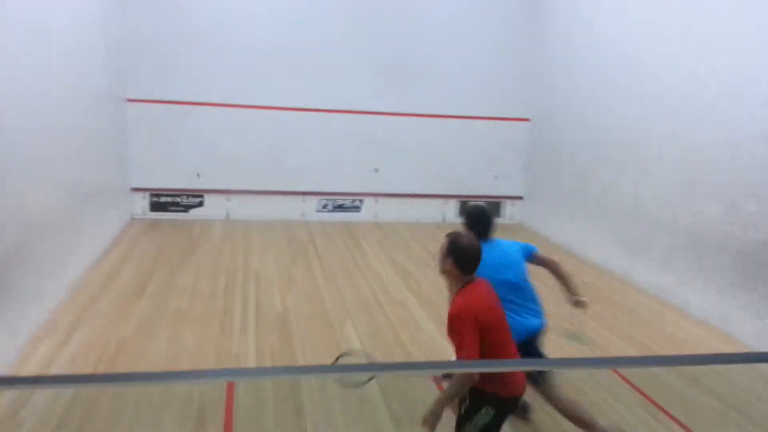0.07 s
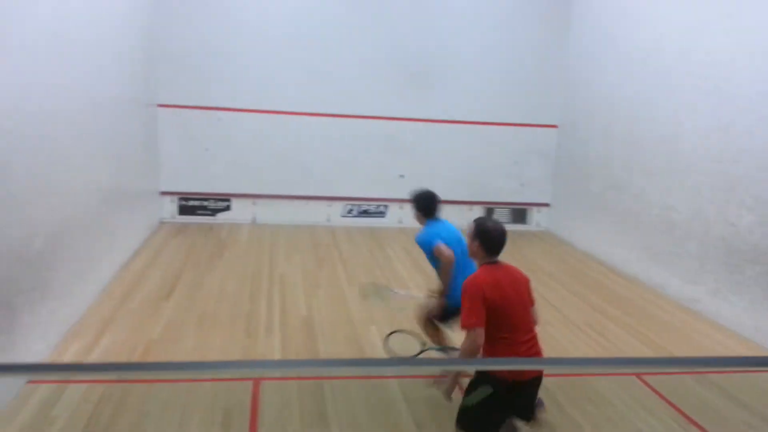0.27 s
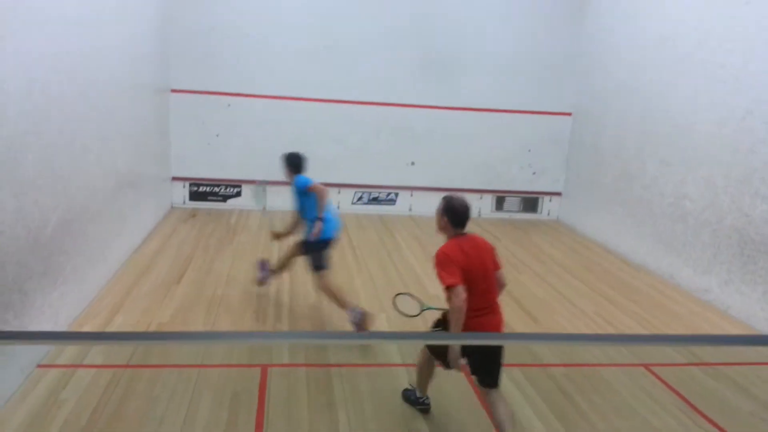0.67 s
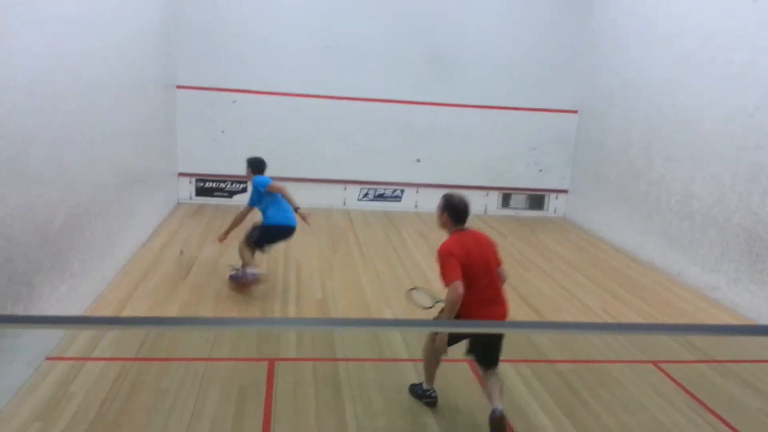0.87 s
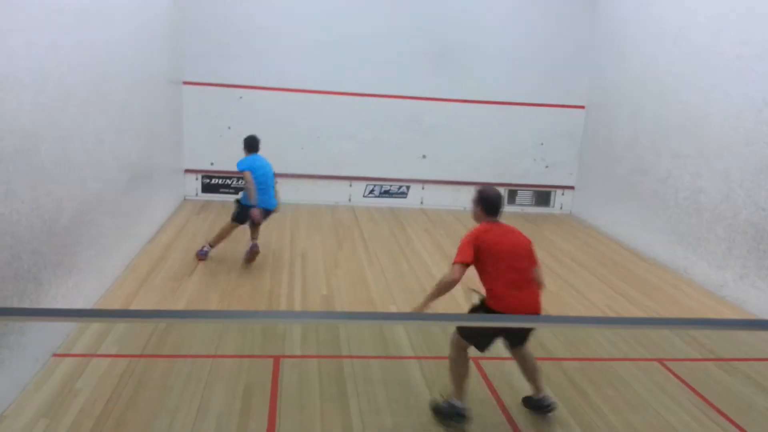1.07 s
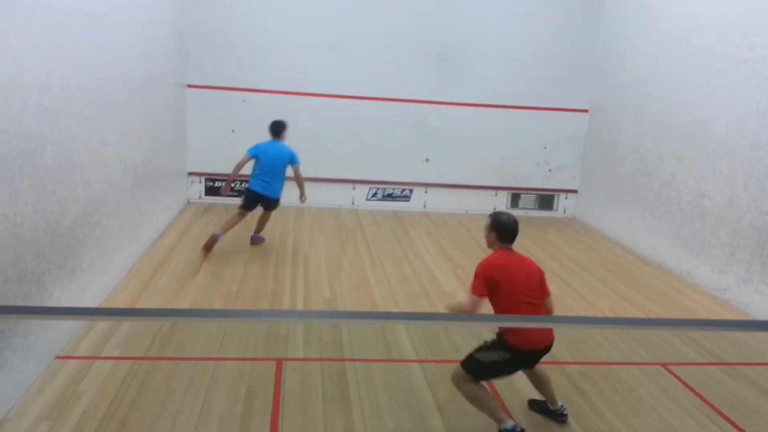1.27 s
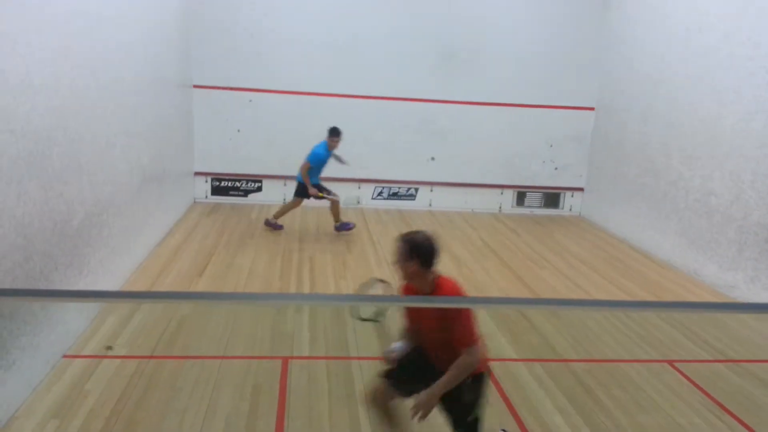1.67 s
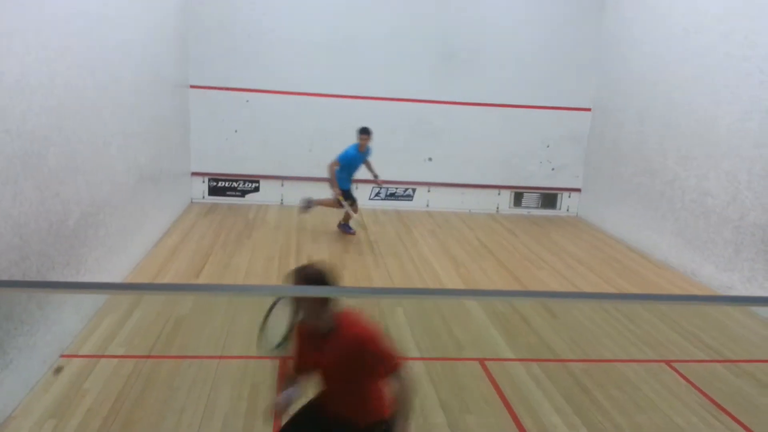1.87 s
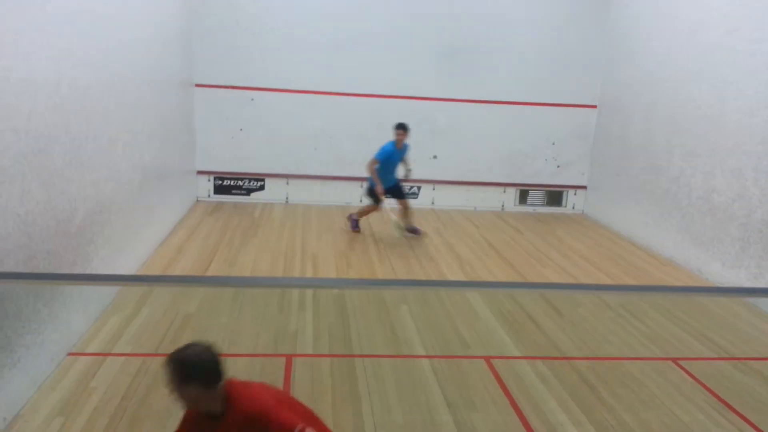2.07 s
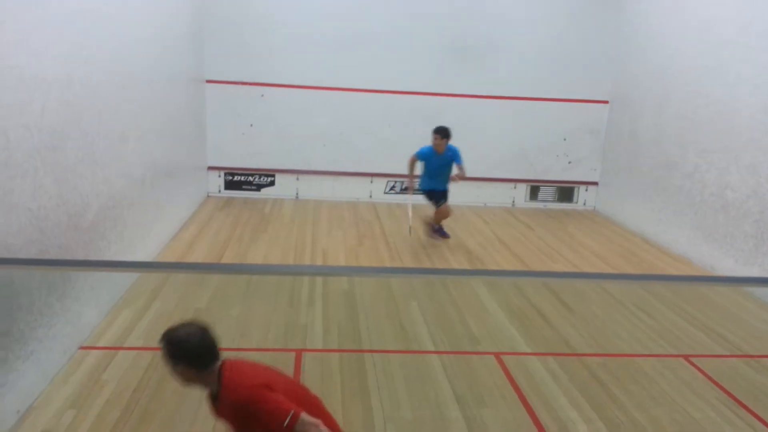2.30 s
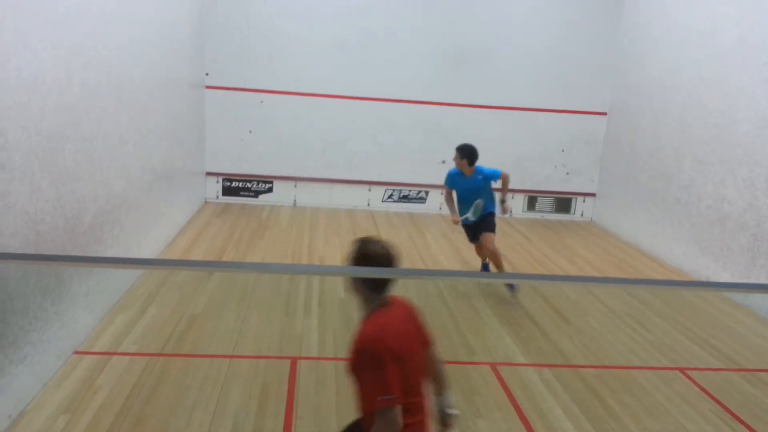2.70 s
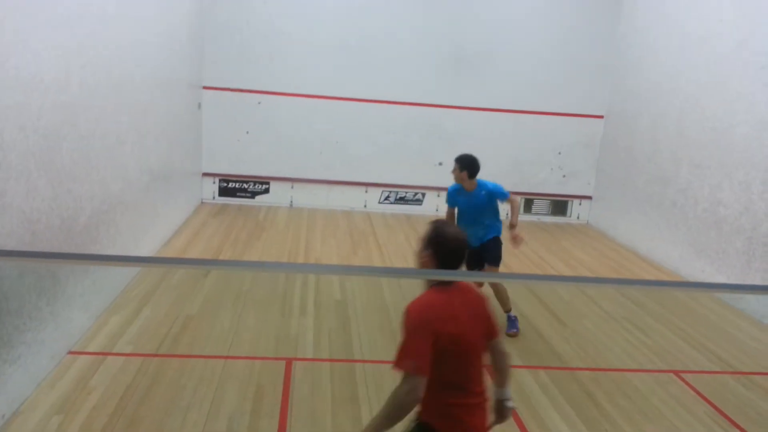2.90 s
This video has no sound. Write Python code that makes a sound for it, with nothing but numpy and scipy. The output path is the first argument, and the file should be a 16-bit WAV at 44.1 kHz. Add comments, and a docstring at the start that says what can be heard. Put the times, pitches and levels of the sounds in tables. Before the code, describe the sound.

A squash ball cracks around an echoing indoor court, first at 0.2 seconds, loudest at 1.0 and 1.15, then near 2.0, 2.25 and 2.7, and faintly just before 3. The walls slap the hits back. Short, high shoe squeaks come around 0.2, 0.5, 1.35, 1.6 and 2.2 seconds. Softer footsteps thud on the wooden floor throughout, over faint ventilation.

```python
"""Squash rally in an echoing court

Heard from behind the back wall, the ball cracks off rackets, walls and floor, and the hard walls
slap the blows back. Rubber soles stick and slip into squeaks, and feet thud on the sprung wooden
floor. Ventilation murmurs underneath."""
import sys
import numpy as np
from scipy import signal
from scipy.fft import rfft, irfft, next_fast_len
from scipy.io import wavfile
from scipy.ndimage import map_coordinates

SR = 44100
rng = np.random.default_rng(int(sys.argv[2]) if len(sys.argv) > 2 else 0)


def to_wav(sig):
    """Store sig (one row per channel, or 1-D mono) as 16-bit WAV at the path in sys.argv[1].

    Samples outside -1..1 are clipped; the rate is SR.
    """
    pcm = np.clip(np.atleast_2d(sig), -1, 1) * 32767
    pcm = np.round(pcm).astype(np.int16)
    wavfile.write(sys.argv[1], SR, pcm.T)  # frames by channels


N = 134505
LEVEL_S = 0.083  # an event's level is its energy spread over this time
LEFT_LAG_S = 0.00034  # direct sound reaches the left side later


def amp(db):
    return 10 ** (np.asarray(db) / 20)


def unit(x):
    """Scale to an average energy of 1 per channel."""
    return x / np.sqrt(np.mean(np.sum(x ** 2, axis=-1)) + 1e-20)


def curve(points, hz):
    """Read (frequency, value) breakpoints on a log-frequency axis."""
    freqs, values = np.transpose(points)
    return np.interp(np.log(hz + 1), np.log(freqs + 1), values)


def shelf(hz, edge_hz):
    """High shelf: 0 well below the edge, 1 well above it."""
    return hz ** 4 / (hz ** 4 + edge_hz ** 4)


def bell(hz, centre_hz, octaves):
    """A resonance: 1 at its centre, 0 far from it."""
    return np.exp(-.5 * (np.log2((hz + 1) / centre_hz) / octaves) ** 2)


def impulse(eq_db, size=4096):
    """The minimum-phase click whose spectrum is eq_db(hz)."""
    cepstrum = irfft(np.log(amp(eq_db(np.fft.rfftfreq(size, 1 / SR)))))
    cepstrum[1:size // 2] *= 2
    cepstrum[size // 2 + 1:] = 0
    return irfft(np.exp(rfft(cepstrum)))


def burst(decay_s, size=4096):
    """A dying burst of white noise."""
    return unit(rng.standard_normal(size) * np.exp(-np.arange(size) / SR / decay_s))


def add(out, start_s, x):
    """Mix x into out from start_s on."""
    i = max(round(start_s * SR), 0)
    out[..., i:i + x.shape[-1]] += x[..., :max(N - i, 0)]


# Stereo image of the room, near mono in the bass and wide above: f/Hz, left-right correlation
ROOM_CORRELATION = [(150, 0.98), (300, 0.82), (550, 0.73), (1000, -0.045), (2000, -0.074), (4000, 0.043),
                    (10000, -0.088)]

def diffuse(size):
    """Stereo noise arriving from all sides."""
    correlation = curve(ROOM_CORRELATION, np.fft.rfftfreq(size, 1 / SR))
    width = np.arccos(np.clip(correlation, -1, 1)) / 2
    white = rfft(rng.standard_normal((2, size)))
    mid, side = irfft(white * [np.cos(width), np.sin(width)], size)
    return np.array([mid + side, mid - side])


# EQ of the room tone: f/Hz, level/dB
ROOM_TONE_EQ = [(70, -50), (150, -5.5), (500, -7.5), (1100, -1.5), (2500, -5.5), (4500, -11), (7000, -21),
                (13500, -39)]

def room_tone(vent_db=-37.5, linger_db=-37.5, fall_db_per_s=65):
    """A steady bed of ventilation, opening on the dying echo of earlier play."""
    colour = impulse(lambda hz: curve(ROOM_TONE_EQ, hz))
    hush = signal.fftconvolve(diffuse(N), colour[None], axes=1)[:, :N]
    linger = amp(linger_db - fall_db_per_s * np.arange(N) / SR)
    return np.sqrt(N) * unit(hush) * np.hypot(amp(vent_db), linger)


# Reverb time of the court: f/Hz, T60/s
COURT_T60 = [(100, 0.71), (300, 1.07), (1000, 1.5), (3200, 2.12), (6000, 1.44), (11000, 0.43)]

def court_reverb(build_s, size=49152, predelay_s=0.0013, early_db=-1, early_t60_s=1, grain=0.5):
    """A fresh echo off the hard walls: grainy early reflections, then a long smooth tail."""
    hz, frame_s, spectrum = signal.stft(diffuse(size), SR, nperseg=256)
    decay = amp(-60 * frame_s / curve(COURT_T60, hz)[:, None])
    tail = signal.istft(spectrum * decay, SR, nperseg=256)[1][:, :size]
    t = np.arange(size) / SR
    early = amp(-60 * t / early_t60_s)
    knots = np.arange(0, size, 64)
    flicker = np.interp(np.arange(size), knots, rng.standard_normal(len(knots)))
    uneven = np.exp(grain * np.sqrt(early) * flicker)
    rise = 1 - np.exp(-np.maximum(t - predelay_s, 0) / build_s)
    return unit(tail * rise * uneven * (1 + amp(early_db) * early))


def in_court(x, direct_db, build_s):
    """Place a mono source in the court: its direct sound plus reverb."""
    paths = court_reverb(build_s)
    paths[0, round(LEFT_LAG_S * SR)] += amp(direct_db)
    paths[1, 0] += amp(direct_db)
    return signal.fftconvolve(x[None], paths, axes=1)


# Base EQ of a ball hit: f/Hz, level/dB
BALL_EQ = [(90, -54.5), (170, -10.5), (270, -2), (600, -2), (1400, 1), (3000, -1.5), (6000, -10.5),
           (10000, -14.5), (14000, -31)]
# Ball hits: t/s, reverb level/dB, direct trim/dB, thump boost/dB, pock f/Hz, pock boost/dB,
# crack shelf/dB, reverb build-up/s
BALL_HITS = [(.191, -23.5, -4, 10, 1034, 8.5, 0, 0.009), (1.0151, -15, -5.5, 11, 862, 19, -6, 0.034),
             (1.1456, -16.5, 1.5, 2, 760, 3.5, -2.5, 0.0044),
             (1.958, -18, -11.5, 0.5, 1760, 3.5, -5, 0.0037),
             (2.2493, -23.5, -1.5, 8, 850, 8.5, -6.5, 0.021), (2.658, -20, 1, 9, 1033, 11.5, -3, 0.0025),
             (2.9544, -34.5, 3, 1.5, 846, 12, -28, 0.0098)]
# Slapbacks off the walls, each repeating the hit before it: t/s, trim/dB
WALL_SLAPS = [(1.030, -1.5), (1.044, -3.5), (1.095, -12), (1.156, -0.5), (1.164, -3.5), (1.26, -8.5),
              (2.268, 1.5), (2.289, -1), (2.3, -2), (2.684, -7), (2.714, -2.5), (2.828, -20)]

def ball(rasp=0.5, path_db=-3.5):
    """Each hit is a click with a thump, a hollow pock and a crack; near walls slap it back."""
    out = np.zeros((2, N))
    wall = impulse(lambda hz: -2 * (1 - shelf(hz, 310) + shelf(hz, 2560)))  # 2 dB off bass and treble
    ends = [hit[0] for hit in BALL_HITS[1:]] + [N / SR]
    for hit, end in zip(BALL_HITS, ends):
        start, db, direct_db, thump_db, pock_hz, pock_db, crack_db, build_s = hit
        click = unit(impulse(lambda hz: curve(BALL_EQ, hz)
                             + thump_db * bell(hz, centre_hz=399, octaves=0.38)
                             + pock_db * bell(hz, pock_hz, octaves=0.25)
                             + crack_db * shelf(hz, edge_hz=2240)))
        gain = amp(db) * np.sqrt(LEVEL_S * SR)
        add(out, start, gain * signal.fftconvolve(click[None], court_reverb(build_s), axes=1))
        contact_noise = signal.fftconvolve(click, burst(decay_s=0.0018))[:len(click)]
        arrivals = [(start, direct_db, click + rasp * contact_noise, LEFT_LAG_S)]
        dulled = signal.fftconvolve(click, wall)
        for at, slap_db in WALL_SLAPS:
            if start < at < end:
                slap = signal.fftconvolve(dulled, burst(decay_s=0.0065))  # many near-equal paths
                arrivals.append((at, slap_db, slap, LEFT_LAG_S * rng.uniform(-1.8, 1.2)))
        for at, trim_db, wave, lag_s in arrivals:
            arrival = gain * amp(path_db + trim_db) * unit(wave)  # one clear path against the reverb
            add(out[0], at + lag_s, arrival)
            add(out[1], at, arrival)
    return out


def sliding(slip, length_s, stretch_s=0.02):
    """A sliding foot meets changing echoes: crossfade through two or three sets of paths."""
    count = int(np.clip(np.ceil(length_s / stretch_s), 2, 3))
    place = np.clip(np.arange(len(slip)) / SR / length_s * count - .5, 0, count - 1)
    fades = [np.clip(1 - np.abs(place - k), 0, 1) for k in range(count)]
    return sum(in_court(slip * fade, direct_db=-3.5, build_s=0.0043) for fade in fades)


# EQ of rubber scuffing on wood: f/Hz, level/dB
SCUFF_EQ = [(200, -24), (1000, 12), (2200, -9), (3500, 20.5), (5000, 8), (8000, 0.5), (11000, -31),
            (13500, -27), (15000, -41)]
# Sole squeaks: t/s, length/s, f/Hz, glide/share of f, level/dB, jitter/share of f,
# overtones/dB re fundamental, scuff/dB re tone, pan/dB left over right
SOLE_SQUEAKS = [(0.21, 0.048, 3210, 0.262, -21.5, 0.082, -26, -14, 0.5),
                (0.233, 0.028, 3276, -0.117, -16.5, 0.017, -10.5, -9, 0.5),
                (0.283, 0.086, 1143, -0.026, -27.5, 0.039, -38, -48, -8.5),
                (0.501, 0.022, 6200, 0.074, -31, 0.016, -19, -27, 4),
                (0.507, 0.047, 3151, 0.0374, -8.5, 0.047, -17.5, -10.5, 0),
                (1.181, 0.025, 4730, 0.048, -21, 0.033, -34, -33, -1),
                (1.342, .075, 2867, -0.12, -15.5, 0.045, -16, -8, 1),
                (1.355, 0.069, 3353, 0.0873, -13.5, 0.034, -26.5, -34, 1),
                (1.599, 0.0087, 6540, -0.136, -22, 0.073, -9, 4.5, 4),
                (1.605, 0.011, 5350, -0.13, -25.5, 0.0078, -15, -24, 2.5),
                (1.604, 0.0273, 3324, -0.052, -11, 0.012, -16.5, -15, -1.5),
                (1.604, 0.0276, 4226, -0.022, -10.5, 0.028, -19.5, -12, 1),
                (2.229, 0.043, 3983, -0.0674, -14, 0.042, -17, -3.5, -0.5),
                (2.246, 0.022, 3250, -0.04, -15, 0.0067, -13, -8.5, 4.5)]

def squeaks(jitter_per_s=1100, chatter_db=1.5):
    """Rubber sticks and slips on the boards: a short unsteady tone with overtones and scuff."""
    out = np.zeros((2, N))
    scuff_colour = impulse(lambda hz: curve(SCUFF_EQ, hz))
    t = np.arange(SR // 8) / SR
    for start, length_s, hz, glide, db, jitter, overtone_db, scuff_db, pan_db in SOLE_SQUEAKS:
        progress = np.clip(t / length_s, 0, 1)
        wander = map_coordinates(rng.standard_normal(len(t)), [t * jitter_per_s])
        pitch_hz = hz * (1 + glide * (progress - .5) + jitter * wander)
        phase = 2 * np.pi * np.cumsum(pitch_hz) / SR
        overtones = np.sin(2 * phase) + amp(-8) * np.sin(3 * phase) + amp(-36.5) * np.sin(4 * phase)
        tone = np.sin(phase) + amp(overtone_db) * overtones
        scuff = signal.fftconvolve(rng.standard_normal(len(t)), scuff_colour)[:len(t)]
        chatter = map_coordinates(rng.standard_normal(len(t)), [t * jitter_per_s])
        grip = amp(chatter_db * chatter) * np.sqrt(np.abs(np.sin(np.pi * progress)))
        slip = unit((unit(tone) + amp(scuff_db) * unit(scuff)) * grip)
        pan = amp([[pan_db / 2], [-pan_db / 2]])
        add(out, start, amp(db) * np.sqrt(LEVEL_S * SR) * pan * unit(sliding(slip, length_s)))
    return out


# Base EQ of the floorboards: f/Hz, level/dB
BOARDS_EQ = [(85, -22), (145, -6.5), (300, -3.5), (1100, -2.5), (2500, -7.5), (8000, -39), (14000, -75)]
# Footfalls: t/s, level/dB, sole slap shelf/dB, floor boom boost/dB
FOOTFALLS = [(.275, -26, -6, -9), (0.543, -20.5, 5.5, -2.5), (.845, -29, -8, 9), (.885, -30.5, -13, 8),
             (1.379, -23, 0, 7.5), (1.76, -24.5, 8.5, -1), (1.993, -36.5, -14, 19.5), (2.739, -32, -4.5, 2)]

def footsteps():
    """The sole slaps down and the sprung floor booms at its lowest resonance."""
    out = np.zeros((2, N))
    for start, db, slap_db, boom_db in FOOTFALLS:
        boards = impulse(lambda hz: curve(BOARDS_EQ, hz)
                         + slap_db * shelf(hz, edge_hz=435)
                         + boom_db * bell(hz, centre_hz=154, octaves=0.12))
        thud = signal.fftconvolve(burst(decay_s=0.014), boards)
        step = in_court(thud, direct_db=-2.5, build_s=0.015)
        add(out, start, amp(db) * np.sqrt(LEVEL_S * SR) * unit(step))
    return out


def scene():
    """The ball and the footwork over a bed of room tone."""
    return ball() + squeaks() + footsteps() + room_tone()


def record(dry):
    """Soft-clip the highest peaks, then cut the deep bass and the very top."""
    low_cut_hz, high_cut_hz = 106, 14900
    clipped = dry / (1 + np.abs(dry) ** 6) ** (1 / 6)
    thinned = signal.sosfilt(signal.butter(3, low_cut_hz, "highpass", fs=SR, output="sos"), clipped)
    size = next_fast_len(N + SR // 2)
    passband = np.fft.rfftfreq(size, 1 / SR) < high_cut_hz
    return irfft(rfft(thinned, size) * passband, size)[:, :N]


dry = scene()
out = record(dry)
to_wav(out)
```